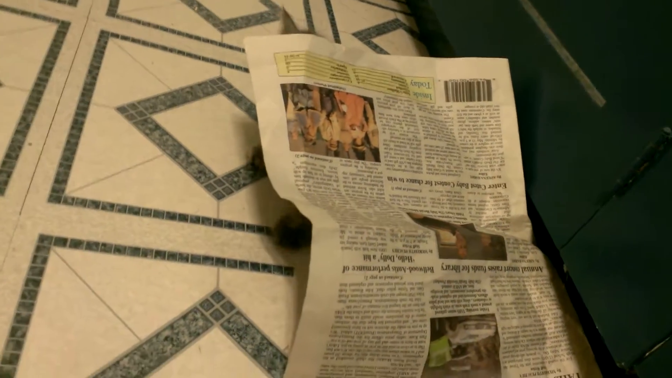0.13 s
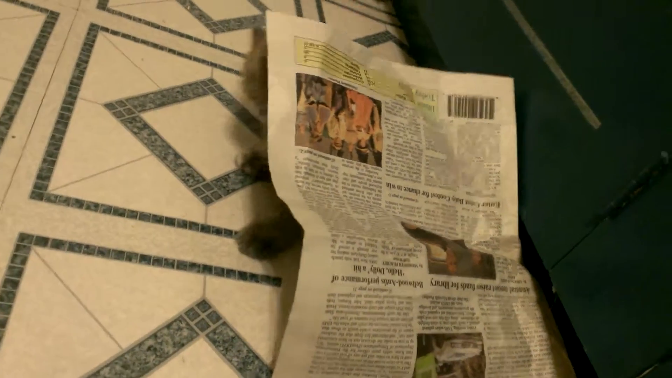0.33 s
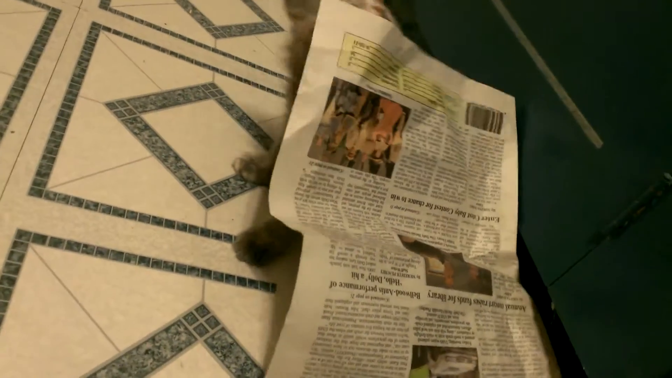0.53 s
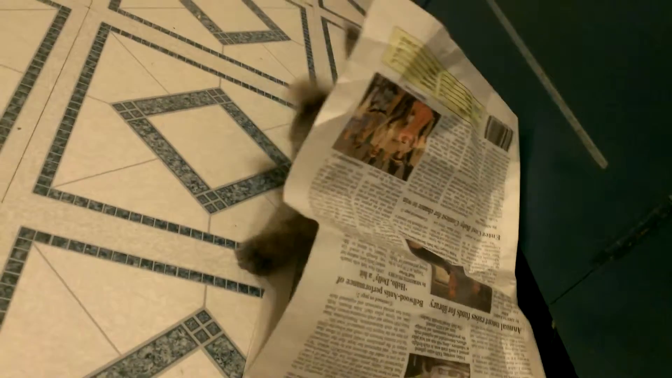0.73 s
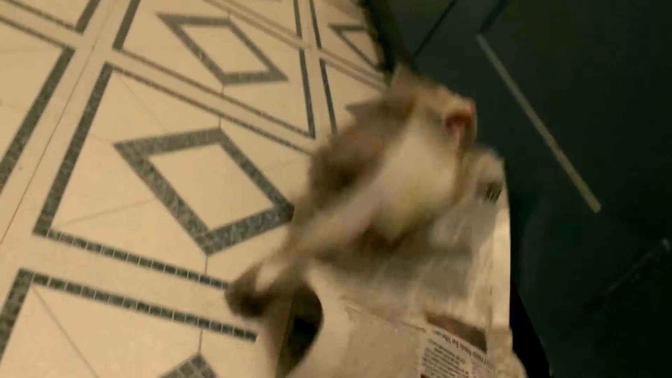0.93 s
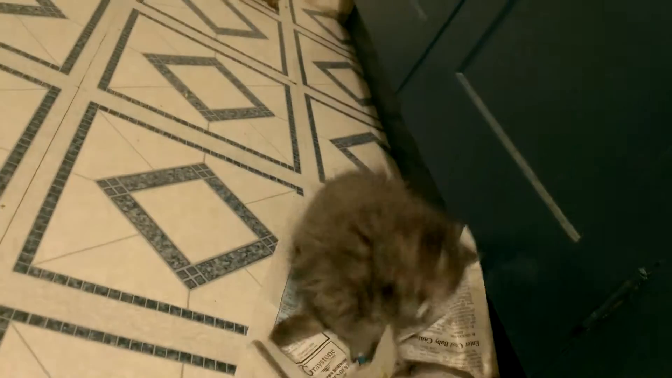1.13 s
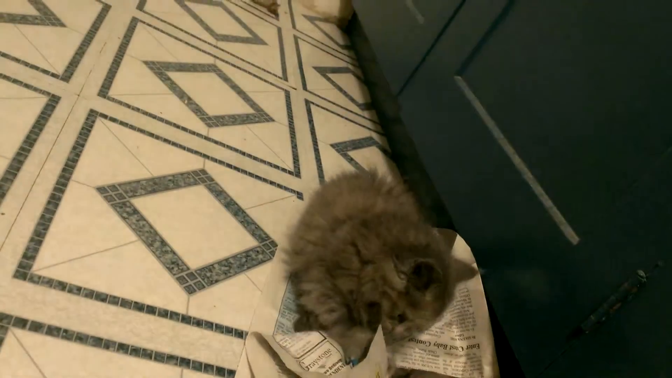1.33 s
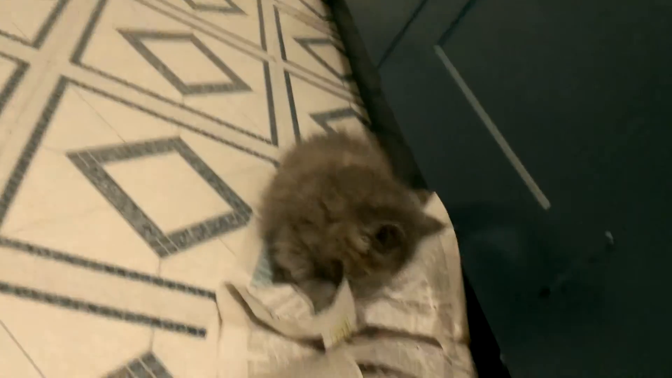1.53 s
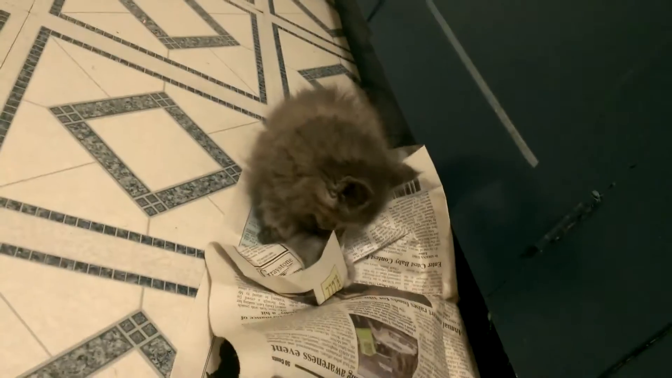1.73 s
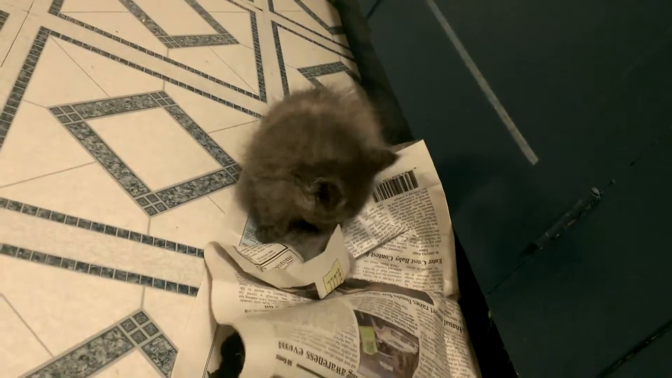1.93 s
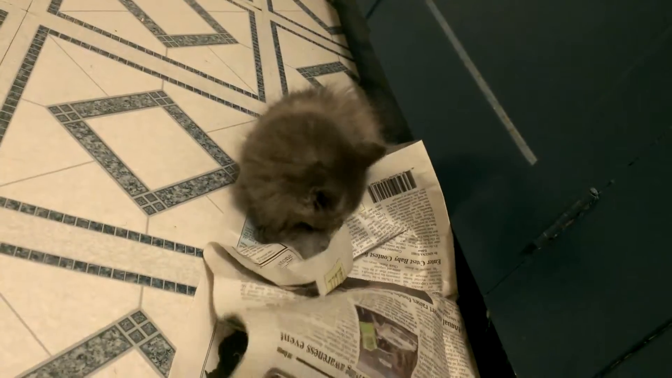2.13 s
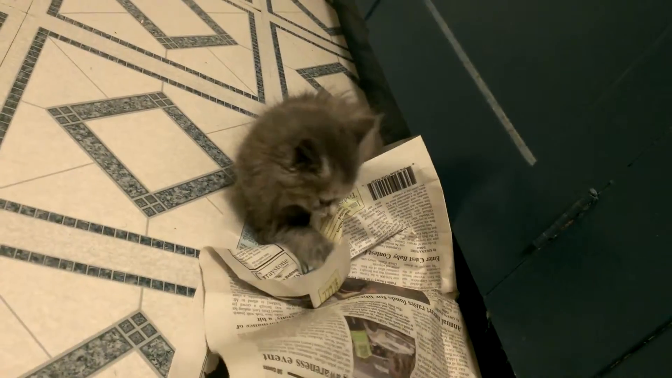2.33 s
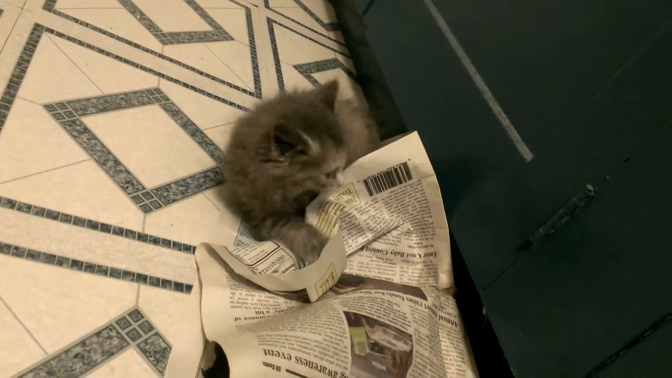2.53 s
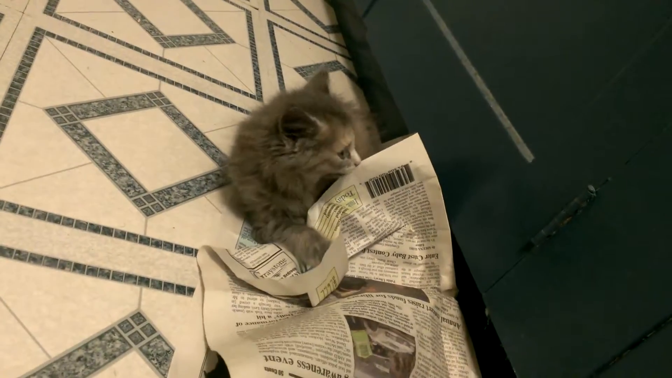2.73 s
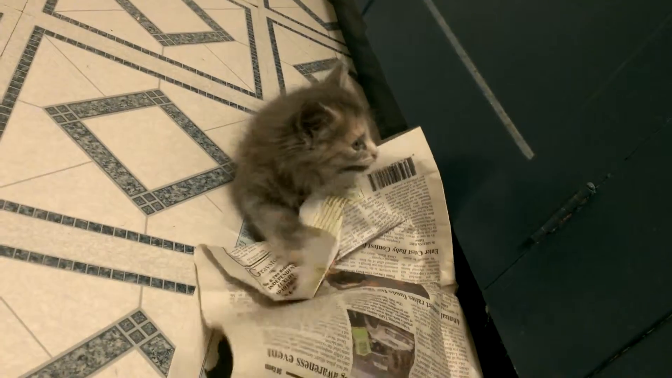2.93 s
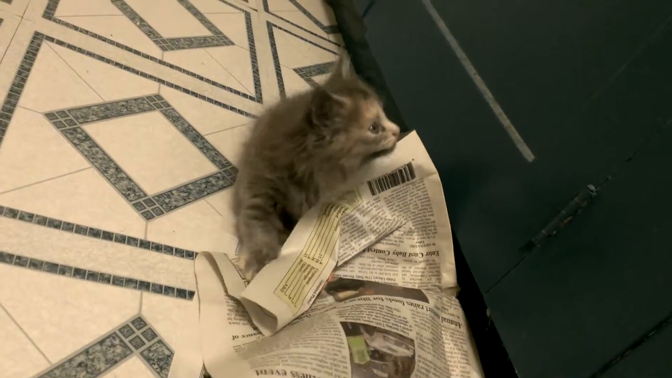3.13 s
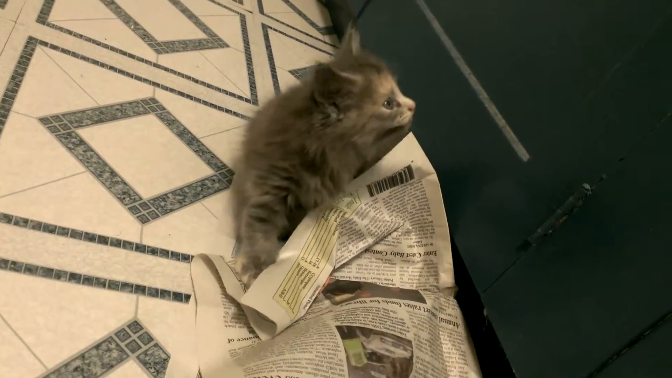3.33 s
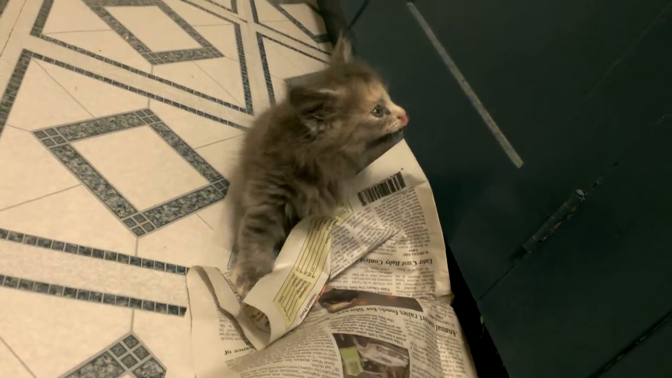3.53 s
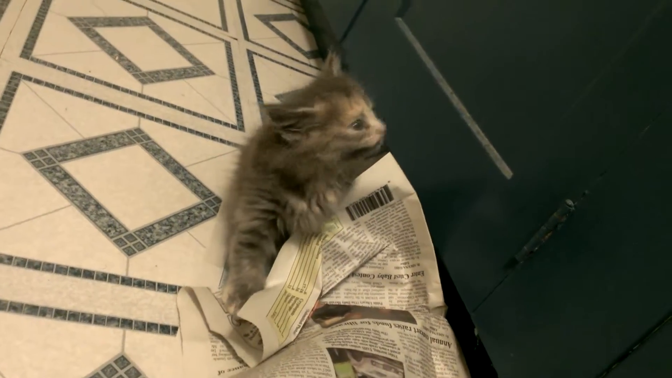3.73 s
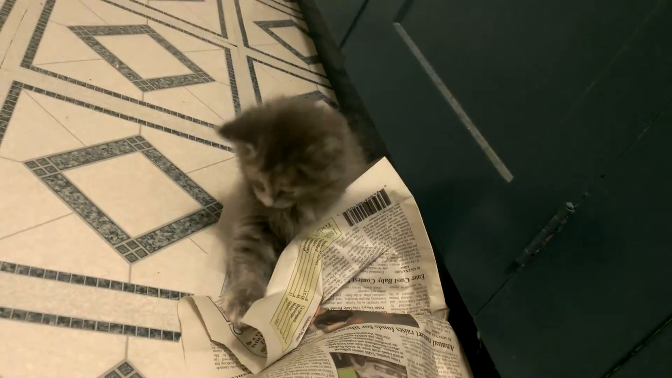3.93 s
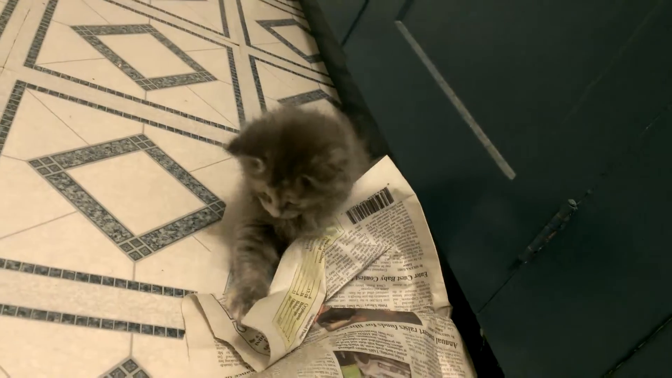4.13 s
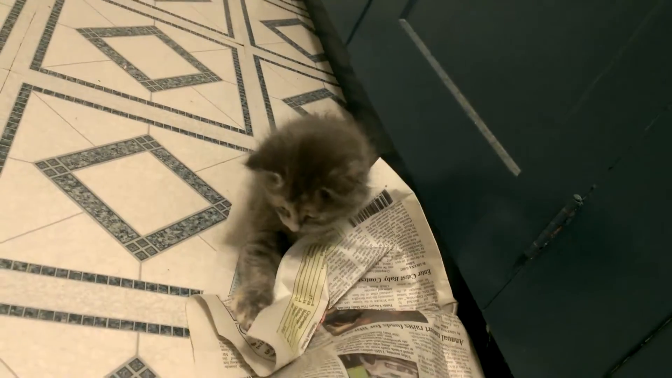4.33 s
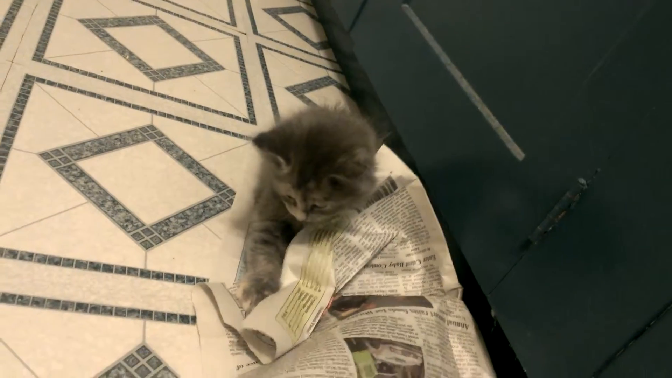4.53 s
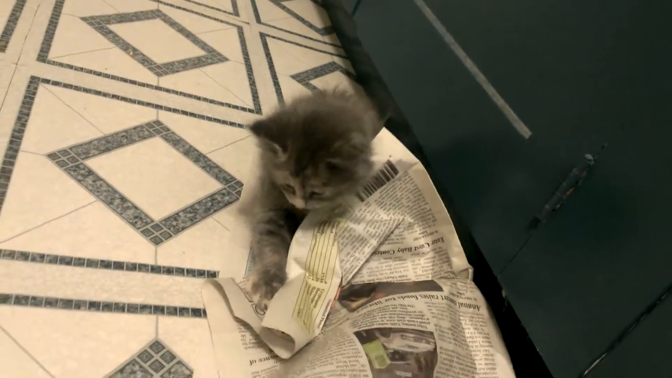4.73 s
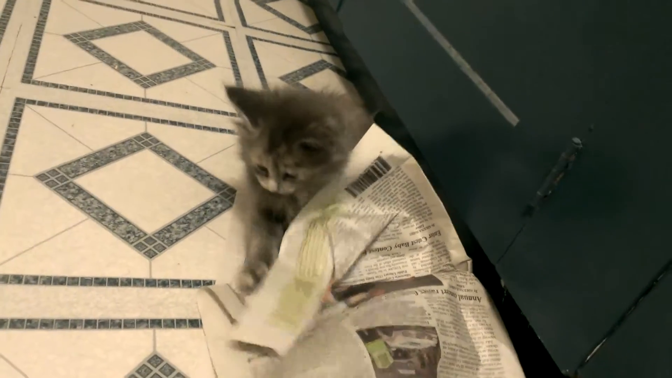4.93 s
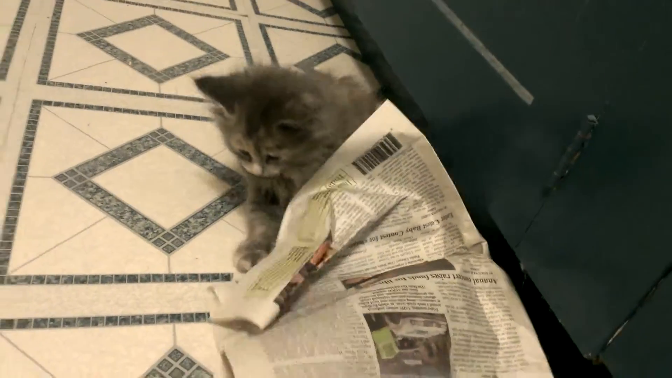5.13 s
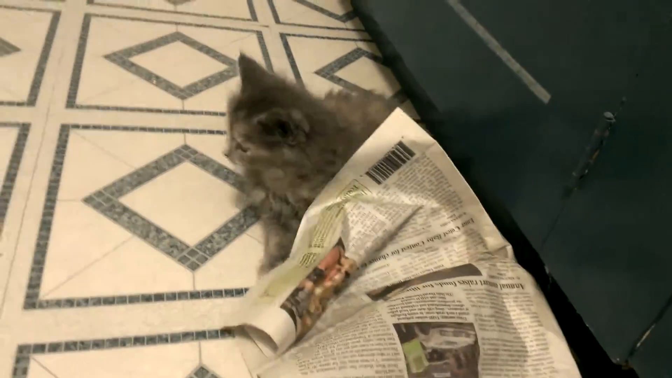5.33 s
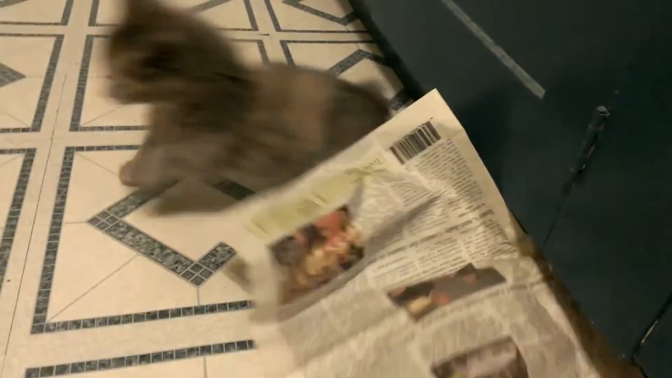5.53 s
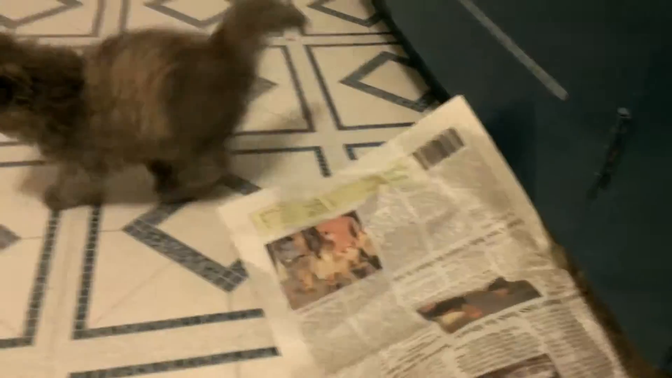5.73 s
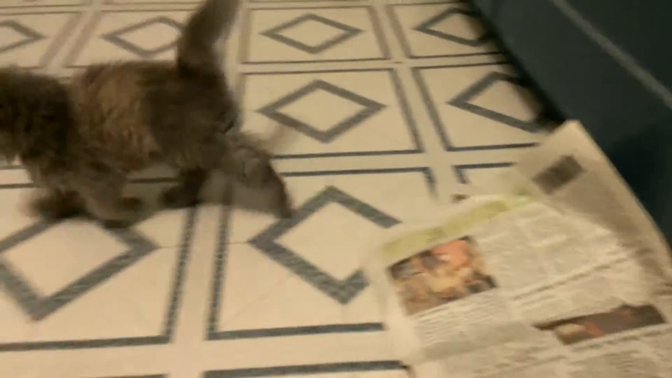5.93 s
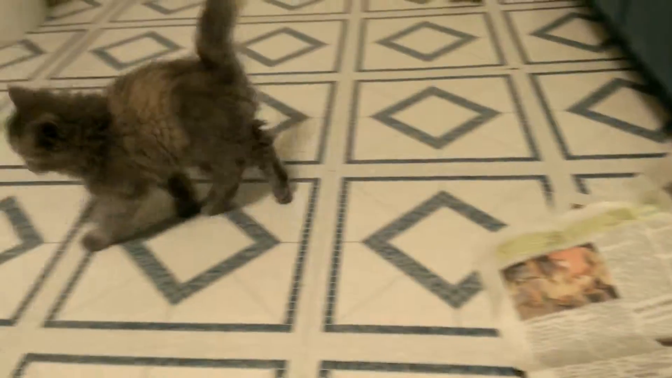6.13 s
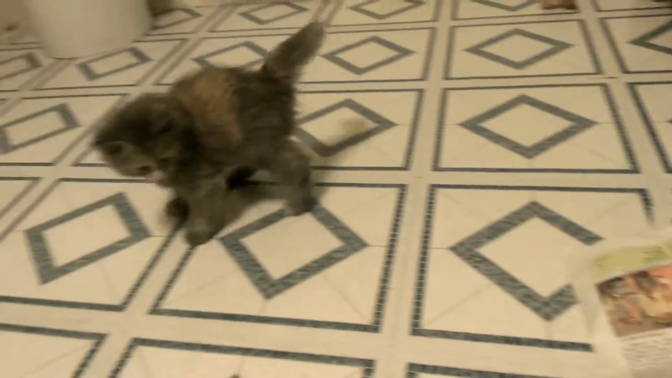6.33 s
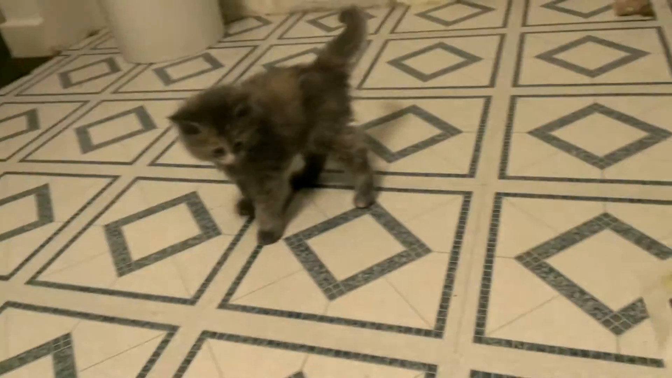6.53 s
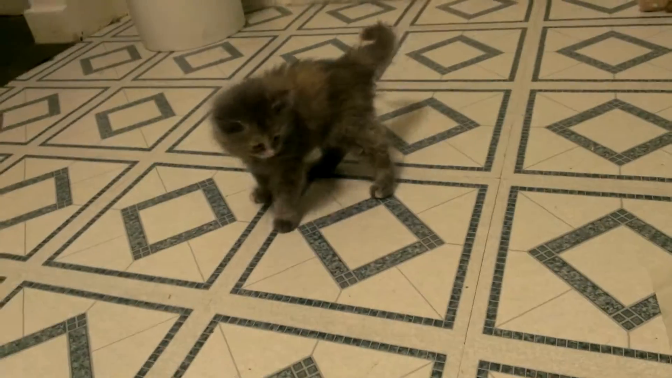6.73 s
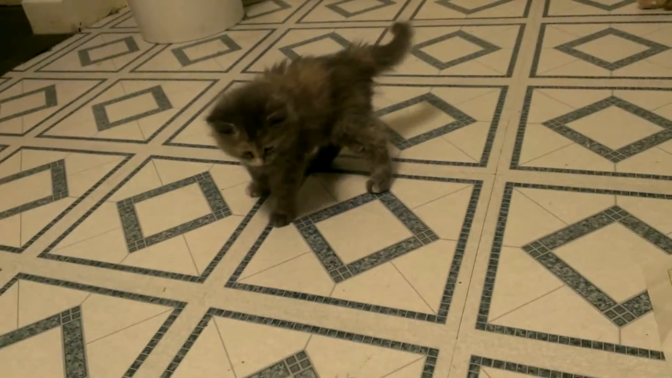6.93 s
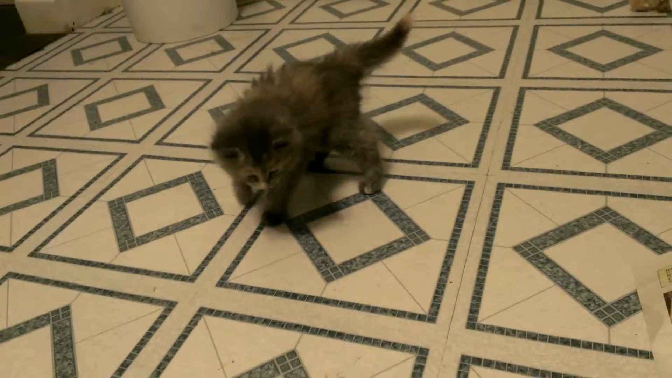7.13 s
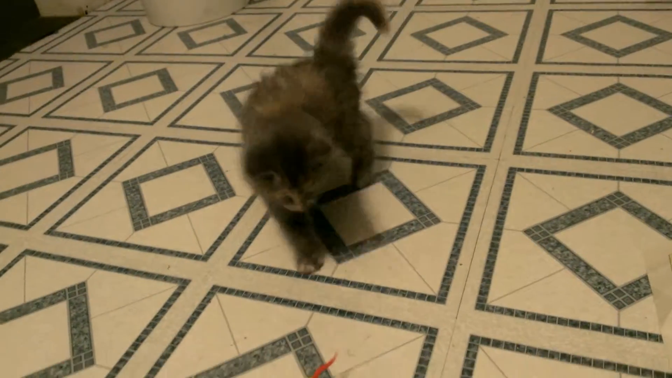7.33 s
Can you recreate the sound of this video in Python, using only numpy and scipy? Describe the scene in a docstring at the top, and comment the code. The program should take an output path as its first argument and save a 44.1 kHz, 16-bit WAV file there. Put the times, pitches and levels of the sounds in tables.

```python
"""A kitten pounces on and paws at a newspaper on a tile floor, close to a hand-held camera.
Motors hum over room tone throughout; a buzz in the right microphone stops at 1.3 s, when the grip changes.
The sheet crumples in small cracks, hisses over the tiles and snaps where folds buckle; the room rings briefly.
Soft bumps on the camera body fall at 0.26 s and 1.29 s, the second beside the hardest paw stroke.
Strokes return near 3 s and from 4.3 s, with small dry pops from 4 to 4.7 s; the rustle fades after 6 s."""
import sys
import numpy as np
from scipy import signal
from scipy.fft import rfft, irfft, next_fast_len
from scipy.io import wavfile

SR = 44100
rng = np.random.default_rng(int(sys.argv[2]) if len(sys.argv) > 2 else 0)


def int16_out(signal):
    """Quantize to a 16-bit WAV file."""
    q = np.round(np.clip(np.atleast_2d(signal).T, -1, 1) * 32767)
    wavfile.write(sys.argv[1], SR, q.astype(np.int16))


N = 329812  # length in samples


def amp(db):
    """Turns decibels into a gain."""
    return 10 ** (np.asarray(db) / 20)


def evened(x):
    """Scales a signal to an rms of one."""
    return x / np.sqrt(np.mean(x ** 2) + 1e-20)


def read(points, hz):
    """Reads a curve of (pitch_hz, value) points along a logarithmic pitch axis."""
    f, value = np.transpose(points)
    return np.interp(np.log(hz + 1), np.log(f + 1), value)


def add(mix, start_s, sound):
    """Lays a short sound into the mix, cut off at the end of the mix."""
    part = mix[:, round(start_s * SR):][:, :sound.shape[1]]
    part += sound[:, :part.shape[1]]


def shaped(x, gain):
    """Multiplies the spectrum by gain(hz)."""
    size = next_fast_len(x.shape[-1])
    spectrum = rfft(x, size) * gain(np.fft.rfftfreq(size, 1 / SR))
    return irfft(spectrum, size)[..., :x.shape[-1]]


def coloured(spectrum, size):
    """Two unrelated noises with the given spectrum, together at an rms of one."""
    noise = rng.standard_normal((2, size))
    return evened(shaped(noise, lambda hz: amp(read(spectrum, hz))))


def drift(top_hz):
    """Slow chance: sines of random phase from 0.2 Hz to top_hz, the slowest strongest."""
    t = np.arange(N) / SR
    waves = [np.sin(2 * np.pi * (f * t + rng.random())) / np.sqrt(f) for f in np.geomspace(.2, top_hz, 8)]
    return evened(sum(waves))


def sides(pan_db):
    """Left and right gains for a left-right balance."""
    return amp(np.multiply.outer([.5, -.5], pan_db))


def ports(pair, alike, pan):
    """Two unrelated signals become left and right with the given likeness and balance."""
    def same(hz):
        return np.clip(read(alike, hz), -.99, .99)

    shared = shaped(pair[0], same)
    own = shaped(pair[1], lambda hz: np.sqrt(1 - same(hz) ** 2))
    left = shaped(pair[0], lambda hz: amp(read(pan, hz) / 2))
    right = shaped(shared + own, lambda hz: amp(-read(pan, hz) / 2))
    return np.array([left, right])


# steady motor tones: (pitch_hz, left_db, right_db, right_lead_radians, waver_db rms)
MOTOR_TONES = [(127.15, -60, -59, 2.2, .4), (120.0, -67.5, -65, 2.3, .8), (118.0, -73, -71, 2.2, 3.),
               (254.1, -75, -78, 2.8, 1.), (2400, -93, -95, 1.5, 2.), (8000, -99, -103, 1.5, 1.5)]
# buzz in the right microphone only: (pitch_hz, level_db)
BUZZ_TONES = [(93.6, -61.5), (140.9, -57)]
BUZZ_END_S = 1.3


def hum():
    """Motor tones that beat against each other, and a buzz that stops when the grip changes."""
    t, out = np.arange(N) / SR, np.zeros((2, N))
    for hz, left_db, right_db, lead, waver_db in MOTOR_TONES:
        angle = 2 * np.pi * (hz * t + rng.random()) + np.array([[0], [lead]])
        level = np.sqrt(2) * amp([[left_db], [right_db]])  # rms to peak
        out += level * amp(waver_db * drift(2.)) * np.sin(angle)
    touching = np.clip((BUZZ_END_S - t) / 0.048, 0, 1)  # lets go over 48 ms
    for hz, db in BUZZ_TONES:
        tone = np.sin(2 * np.pi * (hz * t + rng.random()))
        out[1] += np.sqrt(2) * amp(db) * touching * tone
    return out


# room tone spectrum: (pitch_hz, relative level_db per Hz)
AIR_SPECTRUM = [(12, -39), (20, -14), (45, -27.5), (62, -17.5), (124, -5.5), (145, -10.5), (194, -12),
                (288, -11.5), (365, -10.5), (652, -15), (785, -15.5), (1080, -20), (2940, -24), (3530, -23),
                (10200, -43), (11000, -56), (14300, -87), (22000, -120)]
# room tone in the two microphones: (pitch_hz, left-right likeness)
AIR_LIKENESS = [(60, -0.1), (130, -0.37), (270, -0.67), (560, -0.5), (1190, 0.066), (2520, 0.03),
                (5310, -0.029), (11200, 0.079)]
# room tone balance: (pitch_hz, left_right_db)
AIR_BALANCE = [(60, -10), (140, 0), (340, 0), (820, 3), (1960, -1), (4690, -4), (11200, 4)]
AIR_DB = -59.5


def air():
    """Room tone: coloured noise with a slight slow swell."""
    swell = amp(AIR_DB + .5 * drift(2.0))
    return swell * ports(coloured(AIR_SPECTRUM, N), AIR_LIKENESS, AIR_BALANCE)


# paw strokes on the sheet: (peak_s, crumple_db, rise_s by 20 dB, fall_s by 20 dB,
# flex_db above the crumpling, hiss_db above the crumpling, crumple_centre_hz)
PAW_STROKES = [(.05, -69.5, 0.53, 0.58, -3, -10.5, 2720), (.46, -65.5, 0.16, 0.96, -13, 0, 3570),
               (.67, -52, 0.19, 0.19, -7.5, -7, 3500), (.76, -60, 0.24, 0.13, -7, -1, 3300),
               (.93, -61, 0.088, 0.64, -5, 1, 2860), (1.05, -48, 0.093, 0.23, -0.5, -8.5, 3200),
               (1.14, -35, 0.05, 0.23, -8.5, -8, 3370), (1.283, -28.5, 0.1, 0.059, -9, -9, 3480),
               (1.33, -42.5, .05, 0.17, -31, -15, 3350), (1.549, -49.5, 0.6, 0.19, -11, -4.5, 3360),
               (1.66, -62.5, 0.16, 0.33, -4, -2.5, 3200), (1.96, -62.5, 0.19, 0.7, -8, -4, 3200),
               (2.15, -54.5, 0.44, 0.13, -6.5, -10.5, 3240), (2.33, -58, .15, 0.27, -11, -8, 3200),
               (2.43, -51, 0.28, 0.09, -3.5, -6, 2960), (2.991, -53.5, 0.068, 0.42, -9, -4.5, 3100),
               (3.1, -42.5, 0.11, 0.11, -7, -10.5, 3380), (3.168, -37, 0.05, 0.074, -13, -10.5, 3620),
               (3.221, -50.5, .05, 0.2, -9, -10.5, 3600), (3.43, -56, 0.11, 0.17, -8, -7, 2700),
               (3.64, -64, .3, 0.31, -8, -5, 2700), (3.83, -57.5, 0.027, 0.34, -10, -2.5, 2980),
               (3.93, -58.5, 0.24, 0.066, -4, -3, 2950), (4.32, -46.5, 0.074, 0.32, -7.5, -7.5, 3100),
               (4.37, -50.5, 0.13, 0.16, -11, -16, 3120), (4.409, -33, 0.046, 0.039, -22, -10, 2620),
               (4.5, -64, 0.12, 0.38, -0.5, -15, 2900), (4.67, -51, .08, 0.24, -7, -4.5, 2680),
               (4.75, -39.5, 0.058, 0.055, -17, -9, 2600), (4.96, -51, 0.059, .07, -11, -6.5, 2960),
               (5.07, -40.5, 0.067, 0.085, -8.5, -10.5, 3060), (5.15, -47, .12, 0.2, -7.5, -8, 3170),
               (5.29, -44.5, 0.073, 0.2, -9, -5, 2620), (5.54, -53, 0.093, 0.38, -21, -2, 2900),
               (5.681, -43.5, 0.2, 0.36, -4.5, -6.5, 2830), (5.97, -76, .15, 0.18, -1, -9, 2760),
               (6.11, -62.5, 0.55, 0.036, -16, -6, 3700)]
ROUNDING = 1.006  # above 1 the peak of a stroke is rounder and its ends are steeper
# flexing swells more slowly than crumpling, the hiss starts and stops faster
FLEX_STEEP, HISS_STEEP, HISS_STOP = 0.88, 1.03, 0.18


def strokes():
    """Each stroke swells and dies; overlaps add in power, and the loudest pull the crease pitch to theirs."""
    t = np.arange(0, N + 64, 64) / SR
    s, db, rise, fall, flex_db, hiss_db, hz = np.transpose(PAW_STROKES)[:, :, None]
    age = np.where(t < s, (s - t) / rise, (t - s) / fall)
    down_db = -20 * age ** ROUNDING
    crumple_db = db + down_db
    flexing_db = db + flex_db + FLEX_STEEP * down_db
    sliding_db = db + hiss_db + HISS_STEEP * down_db * (1 + HISS_STOP * age)
    power = amp([crumple_db, flexing_db, sliding_db]) ** 2
    centre = (power[0] * hz).sum(0) / power[0].sum(0)
    curves = (*np.sqrt(power.sum(1)), centre)
    return [np.interp(np.arange(N) / SR, t, c) for c in curves]


CRACK_S = 0.0029  # time constant of one crack


def cracks(per_s, spread_db, steady):
    """Envelope of many tiny creases giving way, a few of them large, over a steady share."""
    size = amp(spread_db * np.minimum(rng.exponential(1, N), 4))
    hits = size * (rng.random(N) < per_s / SR)
    keep = np.exp(-1 / (CRACK_S * SR))
    return evened(steady + evened(signal.lfilter([1], [1, -keep], hits)))


def patch(x, hz, width, rest):
    """A patch of the sheet favours a band around hz, over a flat share called rest."""
    return shaped(x, lambda f: rest + 1 / (1 + ((f - hz) / width) ** 2))


# spectrum of the crumpling sheet: (pitch_hz, relative level_db per Hz)
SHEET_SPECTRUM = [(88, -46), (150, -35), (221, -12), (413, -6), (455, -21), (501, -6.5), (1140, -8.5),
                  (1250, -10.5), (1400, -3.5), (3450, -5), (4050, -0.5), (5330, -8.5), (7000, -17),
                  (9100, -113), (15400, -120)]
# spectrum of the whole sheet flexing: (pitch_hz, relative level_db per Hz)
FLEX_SPECTRUM = [(60, -20), (150, -6), (400, -7), (900, -4), (1400, -4), (2200, -18), (5000, -55)]
# spectrum of paper sliding on tile: (pitch_hz, relative level_db per Hz)
SLIDE_SPECTRUM = [(2500, -11), (4500, 4), (6000, 7), (8000, 6), (10500, 3), (13000, -30)]
# patches of the sheet that crack on their own: pitch_hz
PATCH_HZ = [1810, 2130, 2970, 3610, 4760]


def rustle():
    """Crumpling, flexing and the hiss of paper sliding on tile, all following the paw."""
    crumple_level, flex_level, hiss_level, centre = strokes()
    crumple = 0
    for hz in PATCH_HZ:  # patches near the crease pitch crack loudest
        near_db = -7. * abs(np.log2(hz / centre))
        noise = patch(coloured(SHEET_SPECTRUM, N), hz, 500, 0.35)
        crumple += amp(near_db) * noise * cracks(280, 1.5, 0.44)
    flex = coloured(FLEX_SPECTRUM, N) * cracks(152.4, 3.2, 1.7)
    hiss = coloured(SLIDE_SPECTRUM, N) * cracks(830, 2.5, 0.95)
    return evened(crumple) * crumple_level + flex * flex_level + hiss * hiss_level


# room decay: (pitch_hz, t60_s)
ROOM_DECAY = [(500, 0.19), (1500, 0.21), (3500, 0.12), (9000, 0.16)]


def room(x):
    """Sparse taps of random sign, each band dying at its own speed, other taps for each side."""
    taps = np.zeros((2, SR // 2))
    at = np.arange(160, SR // 2 - 20, 20)
    at = at + rng.integers(0, 20, (2, len(at)))
    np.put_along_axis(taps, at, rng.choice([-1., 1.], at.shape), 1)
    hz, t, bands = signal.stft(taps, SR, nperseg=128)
    fade = amp(-60 * t / read(ROOM_DECAY, hz)[:, None])
    tail = signal.istft(bands * fade, SR, nperseg=128)[1]
    return signal.fftconvolve(x, tail / np.linalg.norm(tail[0]), axes=1)[:, :N]


# soft thumps on the camera body: (start_s, right_db, left_right_db)
BODY_BUMPS = [(0.262, -40.5, -1), (1.2873, -11.5, -24)]
BUMP_START_HZ, BUMP_END_HZ, BUMP_GLIDE_S, BUMP_T60_S = 690, 92.5, 0.0015, 0.052


def bump(db, pan):
    """A soft push on the body glides down in pitch as it rings out."""
    t = np.arange(6000) / SR
    glide = (BUMP_START_HZ - BUMP_END_HZ) * BUMP_GLIDE_S * (1 - np.exp(-t / BUMP_GLIDE_S))
    turns = BUMP_END_HZ * t + glide
    push = np.sin(2 * np.pi * turns) * (1 - np.exp(-t / 0.0017)) * amp(-60 * t / BUMP_T60_S)
    return amp(db) * amp([[pan], [0]]) * push


def bumps(mix):
    """Bumps travel through the camera body, strongest at the right microphone."""
    for s, *row in BODY_BUMPS:
        add(mix, s, bump(*row))


SNAP_RISE_S = 0.0017  # time to rise the last 7 dB
SNAP_LOW = 0.42  # a snap has little sound below this share of its ring


def snap(db, hz, treble_db, fall):
    """A few ms of tearing noise around its peak, a shorter bright edge, and one patch of the sheet ringing on."""
    t = np.arange(-1024, 2048) / SR  # the peak is at zero
    age = np.where(t < 0, -t / SNAP_RISE_S, t / fall)
    shape = amp(-7. * age ** np.where(t < 0, 2.2, 1.5))
    noise = patch(coloured(SHEET_SPECTRUM, len(t)), hz, 450, 0.55)
    thinned = shaped(noise, lambda f: f ** 2 / (f ** 2 + (SNAP_LOW * hz) ** 2))
    tear = evened(thinned * shape) * np.sqrt(np.mean(shape ** 2))
    edge = coloured(SLIDE_SPECTRUM, len(t)) * amp(treble_db - 16.0 * np.where(t < 0, 1.4, 1) * age)
    keep = np.exp(-np.pi * 130 / SR)  # resonance 130 Hz wide
    turn = 2 * np.pi * hz / SR
    ring = signal.lfilter([(1 - keep) * np.sin(turn)], [1, -2 * keep * np.cos(turn), keep ** 2], tear)
    return amp(db) * (tear + edge + 0.9 * ring)


# microphone colour for the paper: (pitch_hz, left_right_db)
PAPER_BALANCE = [(60, -6), (93, -16), (140, 2.5), (220, -2), (340, 4.5), (530, 0.5), (820, 1), (1270, 2),
                 (1960, -5), (3030, -5.0), (4690, -1.5), (7260, 9), (11200, 14)]


def heard(pan_db):
    """Gains that give this balance near 3 kHz once the microphone colour is applied."""
    return sides(pan_db - read(PAPER_BALANCE, 3000))


# paper in the two microphones: (pitch_hz, left-right likeness)
PAPER_LIKENESS = [(60, -0.31), (140, -0.58), (300, -0.79), (600, -0.72), (1000, -0.59), (2000, -0.055),
                  (4700, -0.052), (11000, -0.048)]
# folds buckling: (peak_s, level_db, ring_hz, treble_db above the level, fall_s by 7 dB, left_right_db)
FOLD_SNAPS = [(0.583, -40.5, 3680, -11, .003, -8.5), (0.6712, -39, 3700, -24, 0.0021, -6),
              (0.7413, -43, 2000, -20, 0.0028, -9), (1, -43, 3000, -4, .0017, -6),
              (1.029, -34, 3300, -14, 0.0034, -6.5), (1.0435, -38.5, 2110, -7, .0027, -8),
              (1.0585, -38, 2130, -12, 0.0027, -7), (1.0684, -30.5, 2000, -6, 0.0036, -8),
              (1.1236, -35, 3480, -2, 0.0033, 0), (1.1336, -27.5, 3600, -13, 0.0011, -16),
              (1.1383, -32.5, 2750, -12, 0.0085, -4), (1.1549, -25.5, 3350, -15, 0.0049, -5),
              (1.2023, -32, 3320, -2.5, 0.0032, 2), (1.2183, -25, 3057, -6, 0.0028, -8),
              (1.2432, -30, 3660, -15, 0.0018, -3), (1.2541, -26.5, 2900, -4, 0.0021, -7),
              (1.2687, -27.5, 3200, -2.5, 0.0017, 6), (1.2755, -14.5, 3300, -12.5, .0015, -4.5),
              (1.394, -41, 3180, -4.5, .0028, 0), (1.9883, -44.5, 3500, -14, .0029, -3),
              (2.1746, -38, 3480, -26, 0.0017, -10.5), (2.327, -47.5, 3180, -22, 0.0098, -8),
              (2.413, -39.5, 3180, -7, 0.0021, -10.5), (2.9992, -49, 2971, -4, .0035, -9),
              (3.0508, -40.5, 3600, 3, 0.003, -4), (3.0757, -40.5, 3520, 2.5, .003, -11),
              (3.1011, -30.5, 2060, -15, .007, -2.5), (3.1512, -31, 3500, -1, 0.0031, 0),
              (3.1589, -27.5, 2900, -6, 0.0039, -9), (3.4202, -39.5, 2870, -15, .0021, -3),
              (4.3164, -26.5, 2740, -7, 0.0017, -9), (4.3371, -29, 3360, -4, 0.0084, -6.5),
              (4.413, -30, 2470, -6.5, 0.0046, -9), (4.546, -47, 2000, -15.5, .0026, 1),
              (4.662, -37, 2780, -2.5, 0.0035, -9), (4.971, -38.5, 2280, -11, 0.0043, -8),
              (5.02, -27, 3180, -11.5, 0.0039, -6), (5.0598, -34.5, 2000, -20, .0016, -6.5),
              (5.0647, -34, 2800, 0.5, 0.0023, -4), (5.141, -31, 3520, -8.5, 0.0026, -7.5),
              (5.1994, -41, 1960, -11, 0.0051, -4), (5.2204, -41.5, 2500, -10.5, 0.0037, -10),
              (5.2721, -36.5, 2170, -5.5, 0.0087, -5), (5.499, -47.5, 4020, -6, .003, -6),
              (5.632, -42.5, 2360, -16, 0.004, -8), (5.667, -36.5, 1590, -3, 0.0025, -7),
              (5.7154, -39, 2940, -14, 0.0016, -3), (5.7395, -35, 3300, 3.5, 0.0026, -9),
              (5.864, -45, 2900, -20, 0.0055, 0), (5.9606, -48.5, 1960, -28, .0044, -9),
              (5.9773, -47.5, 3140, -18, 0.0038, -10)]
ROOM_DB = -8


def paper():
    """Rustle and snaps reach the two microphones directly and by way of the room."""
    far = rustle()
    near = ports(far, PAPER_LIKENESS, PAPER_BALANCE)
    for s, *row, pan in FOLD_SNAPS:
        sound = snap(*row)
        start_s = s - 1024 / SR
        add(near, start_s, ports(sound, PAPER_LIKENESS, PAPER_BALANCE) * heard(pan)[:, None])
        add(far, start_s, sound)
    return near + amp(ROOM_DB) * ports(room(far), PAPER_LIKENESS, PAPER_BALANCE)


# ring of a pop, left row then right row: (pitch_hz, t60_s, delay_s)
POP_RINGS = [(320, 0.011, 0.0021), (490, 0.015, 0.00086)]


def pop(db, click_db, thud_db, pan):
    """A sudden step of pressure: a click, a brief ring of opposite sign left and right, and a low thud."""
    out = np.zeros((2, 2000))
    for side, (hz, t60, delay) in enumerate(POP_RINGS):
        t = np.maximum(np.arange(2000) / SR - delay, 0)
        out[side] = (1 - np.exp(-t / .00008)) * np.cos(2 * np.pi * hz * t) * amp(-60 * t / t60)
    ring = out * sides(pan)[:, None] * [[-1], [1]]
    t = np.arange(2000) / SR
    noise = coloured([(100, -9), (1500, -3.5), (11000, -28)], 2000)
    click = amp(click_db - 60 * t / 0.0021) * noise * [[.5], [1]]
    thud = amp(thud_db - 60 * t / 0.039) * np.sin(2 * np.pi * 130 * t) * [[.4], [1]]
    return amp(db) * (ring + click + thud)


# small dry pops: (start_s, level_db, click_db above the level, thud_db above the level, ring left_right_db)
DRY_POPS = [(4.0384, -38, 5.5, -5.5, -2), (4.303, -41.5, -14, -3, 10), (4.53, -38.5, 6.5, -12, 6),
            (4.586, -41.5, 8, -2, 3), (4.654, -40, -15, -7, 4), (4.704, -38, -22, -10, 2)]


def pops(mix):
    """Small steps of pressure, each with its own share of click and thud."""
    for s, *row in DRY_POPS:
        add(mix, s, pop(*row))


def scene():
    """Hum, room tone and paper run throughout; bumps and pops are laid on top."""
    mix = hum() + air() + paper()
    bumps(mix)
    pops(mix)
    return mix


# ring of the cavity in front of each microphone, left row then right row: (gain_db)
CAVITY_DB = [
    [-8],
    [-12],
]
CAVITY_HZ, CAVITY_WIDTH_HZ = 3530, 85
LOW_CUT_HZ, BAND_EDGE_HZ = 19, 10560


def record(dry):
    """The microphone cavities ring, bass and top are cut, and a trace of converter noise is added."""
    cavity = signal.lfilter(*signal.iirpeak(CAVITY_HZ, CAVITY_HZ / CAVITY_WIDTH_HZ, SR), dry)
    low_cut = signal.butter(1, LOW_CUT_HZ, "high", fs=SR)
    heard_in = signal.lfilter(*low_cut, dry + amp(CAVITY_DB) * cavity)
    top_cut = signal.firwin(301, BAND_EDGE_HZ, window=("kaiser", 6), fs=SR)
    band = signal.oaconvolve(heard_in, top_cut[None], "same")
    return band + amp(-105) * rng.standard_normal(dry.shape)


dry = scene()
out = record(dry)
int16_out(out)
```